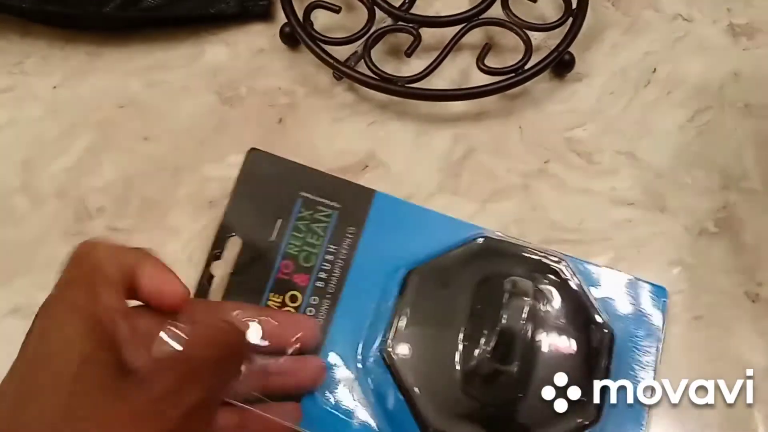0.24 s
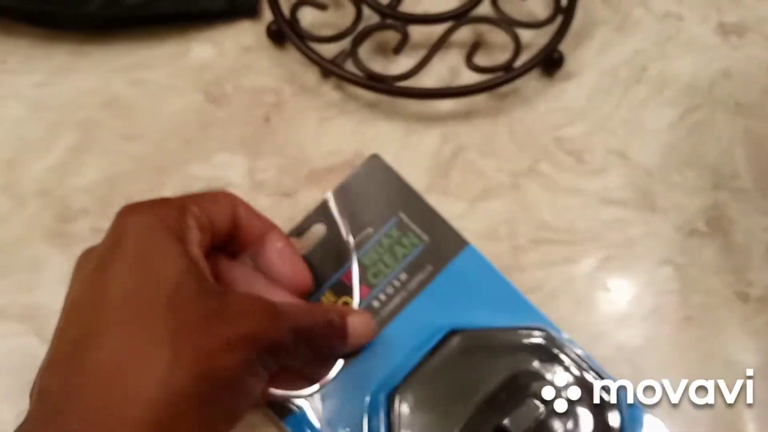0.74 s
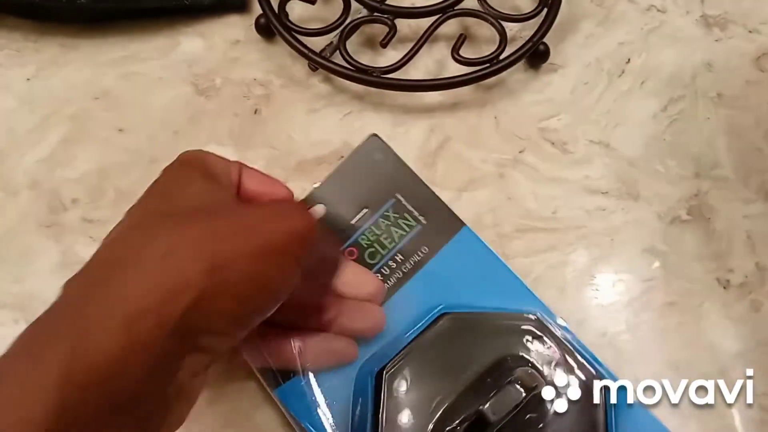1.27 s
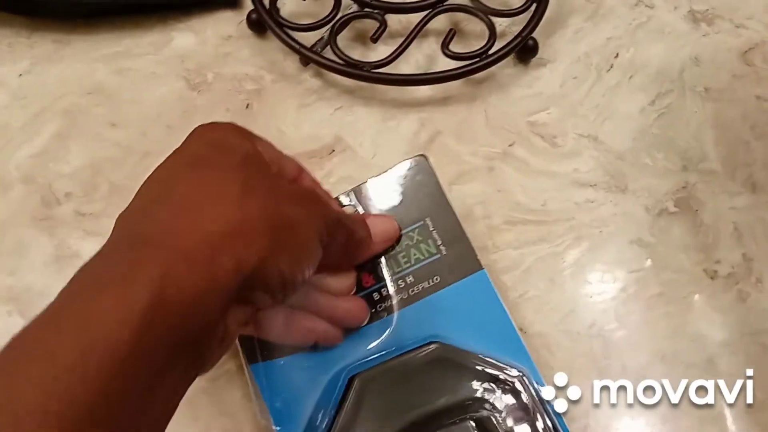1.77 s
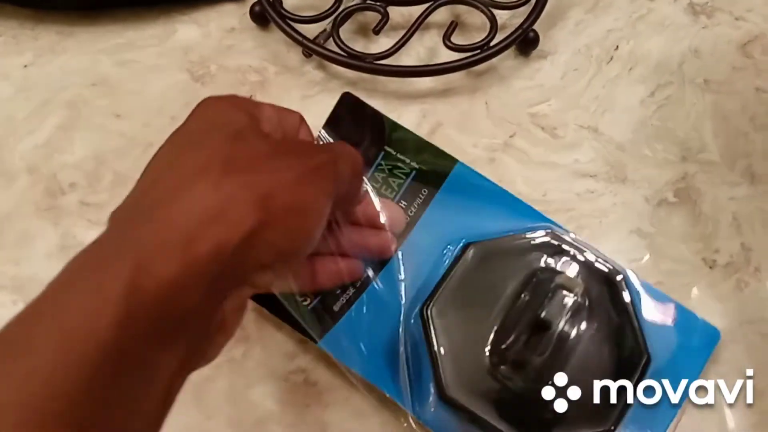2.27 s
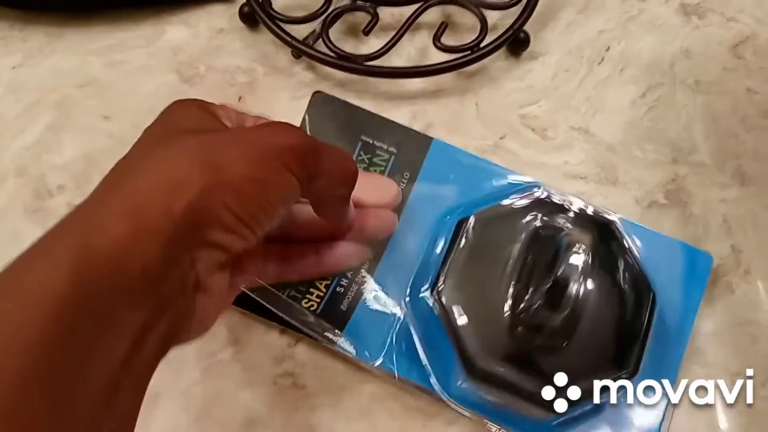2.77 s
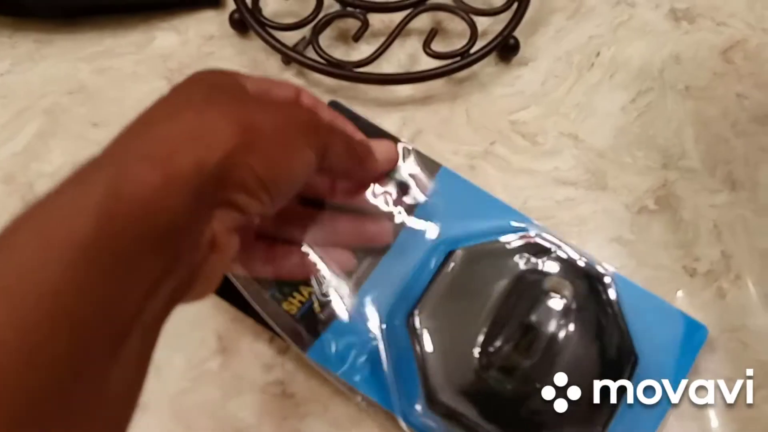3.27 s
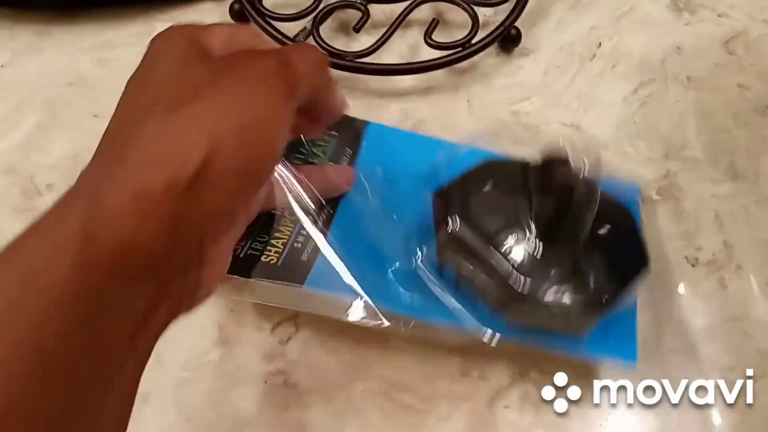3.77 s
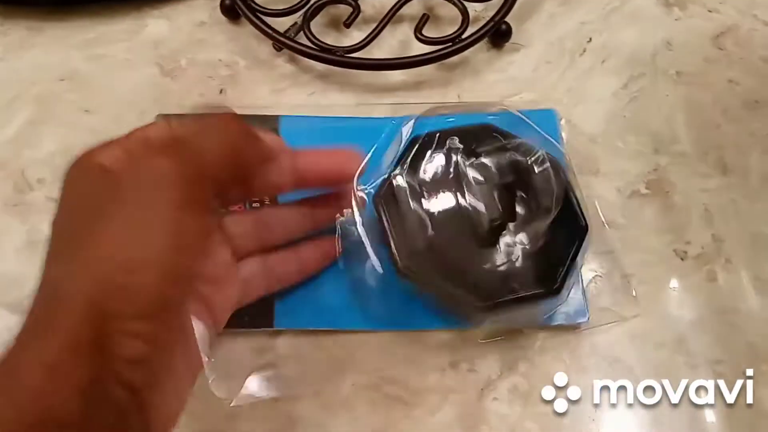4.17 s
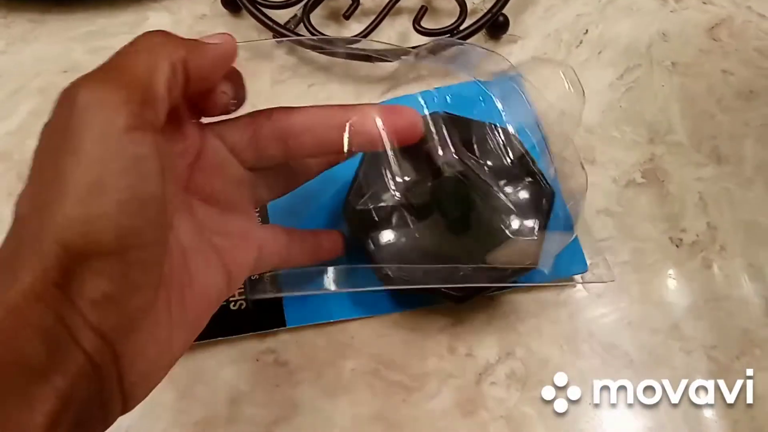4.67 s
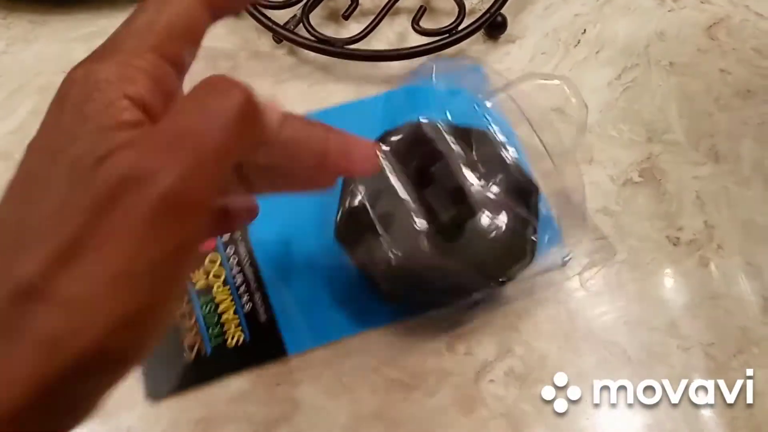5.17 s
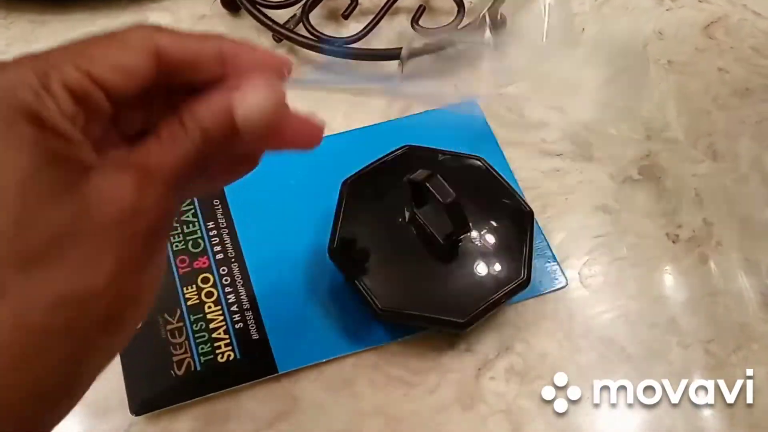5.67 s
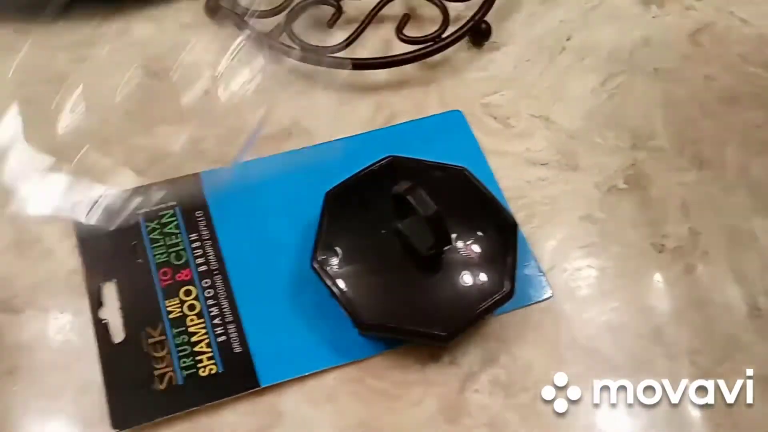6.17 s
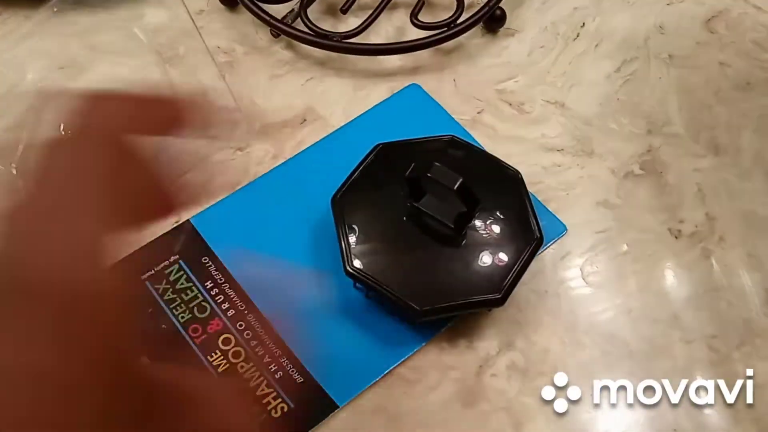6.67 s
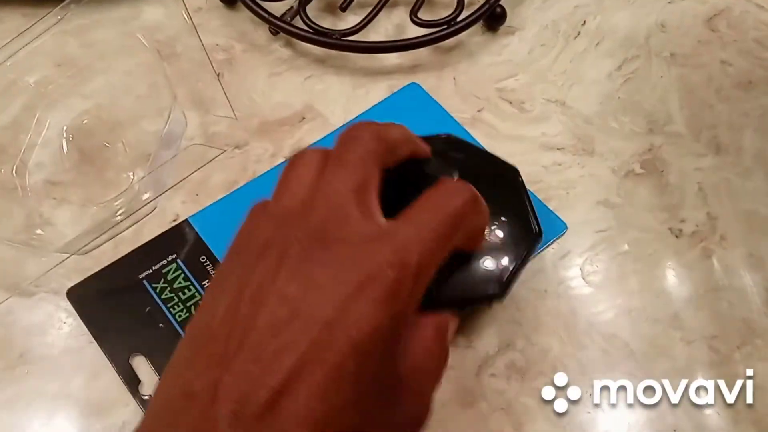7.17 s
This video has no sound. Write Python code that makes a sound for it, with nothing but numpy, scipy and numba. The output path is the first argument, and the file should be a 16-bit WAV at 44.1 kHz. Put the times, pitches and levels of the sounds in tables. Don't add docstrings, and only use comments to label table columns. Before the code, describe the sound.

Stiff clear plastic packaging crackles, snaps and creaks as it is pried off its card on a stone counter in a small echoing room.

```python
import sys
import numpy as np
from scipy import signal
from scipy.fft import rfft, irfft
from scipy.io import wavfile
from scipy.ndimage import uniform_filter1d, minimum_filter1d
from numba import njit

SR = 44100
rng = np.random.default_rng(int(sys.argv[2]) if len(sys.argv) > 2 else 0)


def linear_from_db(decibels):
    return 10 ** (np.asarray(decibels, float) / 20)


def wav_record(signal):
    frames = np.transpose(np.atleast_2d(signal))
    bounded = np.clip(frames, -1, 1)
    quanta = np.round(bounded * 32767).astype(np.int16)
    wavfile.write(sys.argv[1], SR, quanta)


N = 327222
LIFT_S, GRIP_S = 3.95, 6.3


def unit(x):
    return x / np.sqrt(np.mean(x ** 2))


def shape(points, size):
    hz, value = np.transpose(points)
    return np.interp(np.log(np.fft.rfftfreq(size, 1 / SR) + 1), np.log(hz), value)


def causal(points, size=2048):
    cepstrum = irfft(np.log(linear_from_db(shape(points, size))))
    cepstrum[1:size // 2] *= 2
    cepstrum[size // 2 + 1:] = 0
    return irfft(np.exp(rfft(cepstrum)))


def band(x, lo_hz, hi_hz):
    sos = signal.butter(3, [lo_hz, hi_hz], "bandpass", fs=SR, output="sos")
    return signal.sosfilt(sos, x) * np.sqrt(SR / 2 / (hi_hz - lo_hz))


def ring(x, hz, t60):
    pole = np.exp(2j * np.pi * hz / SR - np.log(1000) / (t60 * SR))
    return signal.lfilter([1], [1, -pole], x).imag


def hush():
    # hz [Hz], density_db [dB per Hz]
    spectrum = [(18, -33.5), (30, -10.5), (48, 1), (112, 3), (1910, -19.5), (2680, -11), (4190, -14),
                (9220, -7.5), (16000, -12.5)]
    noise = irfft(rfft(rng.standard_normal(N)) * linear_from_db(shape(spectrum, N)), N)
    return linear_from_db(-68.5) * unit(noise)


def cracks(count, per_s, spread_db):
    hit = rng.random(count) < per_s / SR
    return hit * rng.standard_normal(count) * linear_from_db(spread_db * rng.exponential(size=count))


def split(x):
    return x * rng.choice([-1., 1.], (3, len(x)))


def rustle():
    # start_s [s], flex_db [dB] of the sheet, press_db [dB] on the counter
    pack_hold = [(0, -33.5, -31), (.28, -37.5, -44), (.82, -52, -55.5), (1.16, -36.5, -31.5),
                 (1.33, -45.5, -53.5), (2.04, -47, -39.5), (2.24, -52, -26.5), (2.45, -59, -51),
                 (2.73, -47, -80), (2.75, -37.5, -34), (3.35, -50.5, -64), (3.55, -45, -44),
                 (3.7, -42, -36), (3.74, -28, -23.5), (4.04, -50.5, -61), (4.42, -36, -33),
                 (4.54, -53.5, -57.5), (5.24, -49.5, -74), (5.578, -45.5, -47), (5.95, -92, -75.5)]
    # start_s [s], flex_db [dB], press_db [dB]
    brush_hold = [
        (6.349, -67, -50),
        (6.572, -59, -60),
        (6.834, -42.5, -37.5),
        (7.05, -66, -76),
    ]
    rumble_db, rumble_slope = -62.5, 0.67
    sizzle_db = -3
    drive, rumble, t = np.zeros((3, N)), np.zeros(N), np.arange(N) / SR
    grains = unit(cracks(N, 1200., 0.9)) + 0.37 * rng.standard_normal(N)
    parts = split(unit(grains))
    rub = band(rng.standard_normal(N), 86.0, 160.0)
    for table in pack_hold, brush_hold:
        s, flex_db, press_db = np.transpose(table)
        rub_db = rumble_db + rumble_slope * (press_db + 45)
        rumble += rub * linear_from_db(np.interp(t, s, rub_db, left=-120, right=-120))
        for row, part, db in zip(drive, parts, (press_db, flex_db, flex_db + sizzle_db)):
            row += part * linear_from_db(np.interp(t, s, db - 6, left=-120, right=-120))
    wrinkles = signal.butter(N=3, Wn=2120, btype="highpass", fs=SR, output="sos")
    drive[1] = signal.sosfilt(wrinkles, drive[1])
    return drive, rumble


def snaps():
    # start_s [s], level_db [dB], body_db [dB], sizzle_db [dB], burst_ms [ms]
    prying = [(0.0517, -26, -6, -9, 18), (0.136, -32.5, 1.5, -7, 8.2), (0.1651, -22, -1.5, -11.5, 11.7),
              (0.2589, -26, 10, -23, 4.1), (0.266, -28, -4, 12.5, 4.7), (0.3426, -12, 2, -12.5, 3.3),
              (0.3535, -16, -6, -2, 6.7), (0.4531, -28, 1.5, 13.5, 5.9), (0.635, -13, 5, -4, 7.2),
              (0.6637, -27.5, 2.5, -5, 7.2), (0.833, -34, -11, -2.5, 8.4), (1.0032, -28, 0, -5, 4.3),
              (1.074, -32.5, 6, -5, 9.4), (1.1712, -28.5, -17.5, 8, 10.2), (1.2148, -27.5, 8.5, -17, 4.4),
              (1.2851, -26.5, -30, 2, 3.4), (1.335, -2.5, -5.5, -3, 3.96), (1.451, -19, -11, -1.5, 3.4),
              (1.555, -31, -27.5, 2, 20), (1.5803, -30.5, -4.5, 3.5, 7.8), (1.601, -34.5, 2, -4, 31),
              (1.699, -3.5, -3, -4, 1.82), (1.7752, -23.5, -0.5, -12, 4.8), (1.972, -25.5, -11.5, -1, 1.6)]
    # start_s [s], level_db [dB], body_db [dB], sizzle_db [dB], burst_ms [ms]
    ripping = [(2.1289, -2, -6.5, -2, 1.65), (2.1189, -26.5, -7.5, -2, 19), (2.457, -31, 1.5, -9, 4.9),
               (2.2265, 1, -11, -6, 1.92), (2.232, -12, -3, 9.5, 1.56), (2.263, -26.5, 2, -6, 3.2),
               (2.2774, -1.5, -6, -15.5, 2.08), (2.328, -19.5, -34, -3, 2.1),
               (2.3602, -15.5, -0.5, -26.5, 1.7), (2.381, -19, -10.5, -19.5, 3),
               (2.403, -20.5, 0.5, -23.5, 1.8), (2.467, -15.5, -1.5, -11.5, 1), (2.4793, -24, 5, -26, 1.8),
               (2.5037, 8, -1.5, -2, 6.6), (2.508, -9, -13, 7, 8), (2.7478, -22, 7, 2.5, 5.6),
               (2.8101, -10.5, -6.5, 1, 4.8), (2.8917, -22, -19, 5, 5.7), (2.9004, -15, -7, 0.5, 3.4),
               (2.9349, -15.5, -4.5, -6, 4.3), (3.0602, -15.5, -4.5, 1, 4.2),
               (3.4834, -18.5, 0, -13.5, 1.3), (3.5025, -15.5, 2.5, -29, 4.1),
               (3.7143, -6, -10, -10.5, 4.3)]
    # start_s [s], level_db [dB], body_db [dB], sizzle_db [dB], burst_ms [ms]
    lifting = [(3.8582, -24, -19.5, 7, 5.4), (3.9639, -29, 4.5, -4, 8), (4.0144, -36, 1, 0.5, 11),
               (4.122, -32, -1, -3, 10.3), (4.221, -39, -2, 0, 21), (4.2524, -14, 2, -5, 5.4),
               (4.3155, -32, 5.5, 4, 19), (4.3333, -26, -1.5, -1, 20), (4.4075, -16, -21.5, -3, 4.6),
               (4.4145, -25, -7, -5, 22), (4.56, -38.5, -1.5, -11, 22), (4.684, -31.5, -10.5, -6.5, 14),
               (4.738, -26.5, 3, -8, 24), (4.7456, -21, 1.5, 7.5, 11.5), (4.868, -34, -3, 3.5, 3.7),
               (5.0308, -35, -8, 13.5, 4.8), (5.1465, -37, -39, -1, 6.2), (5.279, -28.5, -12, 9.5, 1.9),
               (5.311, -28, -10, 3.5, 6.6), (5.4141, -24, -14, -5.5, 11.7), (5.463, -9, -1, 2.5, 7.4),
               (5.499, -25.5, -19, 4, 21), (5.702, -34, -4, -1, 10), (5.7417, -20, -6.5, 7.5, 7.5)]
    # start_s [s], level_db [dB], body_db [dB], sizzle_db [dB], burst_ms [ms]
    gripping = [(5.818, -39, 10, -16.5, 7.4), (5.8407, -36, 13.5, -5, 1.7), (6.087, -48.5, -44, 24, 2.2),
                (6.3515, -37, 7, -6, 7.7), (6.369, -44, 15.5, 0, 21), (6.397, -34.5, 8, 1.5, 3.2),
                (6.409, -44.5, 15.5, 4, 15), (6.4212, -43, 11.5, -7, 6.3), (6.5145, -27.5, -33, 1.5, 3.8),
                (6.5646, -39, -13, 3.5, 12.5), (6.5888, -27, -7.5, 3.5, 8.4), (6.6288, -36, -23, 8.5, 3),
                (6.661, -31, -9, 4, 3.4), (6.671, -38, 4, -3, 3), (6.6817, -35, -1, 2, 3),
                (6.7036, -35.5, 0, 3, 2.9), (6.715, -35.5, -7, 8, 2.8), (6.7277, -36.5, -2, 4, 3),
                (6.78, -35, -39, 3.5, 10.6), (6.8393, -27, -33, 0.5, 6), (6.896, -37.5, -9.5, -4.5, 19.5),
                (7.0887, -59, -32, 0, 16), (7.1814, -56.5, -32, 5, 5.2), (7.3435, -73, -9.5, 15.5, 13)]
    # start_s [s], level_db [dB], body_db [dB], sizzle_db [dB], fall_ms [ms]
    tear_rows = [(.005, -23, 0, -7, 18), (.539, -35, 8.5, 3.5, 10.7), (0.599, -29, 2, 2, 23),
                 (0.842, -30.5, -30, 8, 25), (1.292, -32.5, -6, 9.5, 28), (2.232, -26.5, -8, 8, 65),
                 (.262, -30.5, -10.5, 5.5, 3.5), (2.511, 7, -5, -5.5, 7.9), (2.846, -26.5, 3, 3, 33),
                 (3.383, -39.5, -1.5, -7, 32), (3.727, -13.5, -2.5, .5, 49.5), (4.079, -31.5, -2, 3, 14),
                 (4.19, -41.5, -22, 3, 24), (4.909, -29, -6.5, 1, 43.6), (5.373, -31, -5, 3, 35),
                 (3.162, -36.5, -3, 2, 39), (6.035, -61, -9.5, 18.5, 88), (6.429, -40.5, 9, -1.5, 34),
                 (6.598, -39.5, 11.5, -28, 29.6)]
    linger = np.array([[1.2], [1.], [.6]])
    longest_ms, tear_rise = 14, 0.49
    size = 16384
    drive, ms = np.zeros((3, N + size)), np.arange(size) * 1000 / SR
    swarm = split(unit(cracks(N + size, 16000., 0.4)))
    events = []
    for *start_and_levels, burst_ms in prying + ripping + lifting + gripping + slips():
        events.append((*start_and_levels, .3, min(1.046 * burst_ms - 1.2, longest_ms)))
    for *start_and_levels, fall_ms in tear_rows:
        events.append((*start_and_levels, tear_rise * fall_ms, fall_ms))
    for s, db, body_db, sizzle_db, rise_ms, fall_ms in events:
        i = int(s * SR)
        rise = 1 - np.exp(-ms / max(rise_ms, .05))
        fall = np.exp(-ms / max(fall_ms, .3) / linger)
        burst = swarm[:, i:i + size] * fall * rise
        burst[:, 6] += 0.3 / max(rise_ms, .05)
        parts_db = np.array([[body_db], [0], [sizzle_db]])
        drive[:, i:i + size] += linear_from_db(db - 0.5 + parts_db) * burst
    return drive[:, :N]


def knocks():
    # start_s [s], level_db [dB], pitch_hz [Hz], t60_s [s],
    # contact_ms [ms]
    blows = [(0.342, -18.5, 421, 0.04, 6.5), (0.637, -58, 300, 0.022, 5.1), (2.503, 9, 108, 0.03, 5),
             (2.748, -12.5, 380, 0.066, 6.3), (3.06, -25, 156, 0.028, 15), (4.25, -40, 316, 0.042, 5.2),
             (4.633, -34, 803, 0.18, 3.7), (5.461, -9, 875, 0.08, 10), (5.748, -21, 871, .1, 10),
             (5.816, -23, 940, .05, 6), (5.816, -28, 620, 0.082, 8.1), (.006, -5, 1330, .015, 45),
             (.006, -18, 685, 0.043, 40), (.165, -9, 1350, .015, 5), (.259, -12, 1150, .015, 3),
             (1.53, -28, 1250, .02, 4), (4.745, -20, 875, .1, 14), (4.253, -13, 1120, .03, 7),
             (1.335, -17.5, 715, 0.055, 8), (2.506, -14, 300, .05, 12), (2.507, -3, 1100, .03, 20),
             (5.473, -24, 285, .06, 25), (5.817, -24, 425, 0.15, 22), (5.828, -15, 296, 0.08, 21),
             (2.508, 12, 58, 0.04, 8), (0.551, -29, 191.3, .05, 48), (6.413, -34.5, 169, 0.17, 39),
             (6.861, -28, 266, 0.1, 26)]
    overtone = .35
    out, ms = np.zeros(N), np.arange(N) * 1000 / SR
    jolts = band(rng.standard_normal(N), 36.0, 1300.0)
    for s, db, hz, t60, contact_ms in blows:
        since = ms - 1000 * s
        push = (since > 0) * np.exp(-np.abs(since) / contact_ms) * (1 + jolts)
        push *= linear_from_db(db) / np.linalg.norm(push) / 4
        pair = ring(push, hz, t60) + overtone * ring(push, 1.3 * hz, t60)
        out += signal.lfilter(*signal.butter(2, hz / 2, "highpass", fs=SR), pair)
    return out


def slips():
    # start_s [s], length_s [s], slips_per_s [1/s], level_db [dB], swell_db [dB] to the end
    creaks = [(0.77, 0.04, 150, -31.5, -2), (0.175, .05, 143, -25, -6), (1.075, 0.044, 110, -28, -3),
              (1.15, 0.025, 150, -28.5, 2), (1.555, .04, 130, -30.5, -5), (2.135, 0.02, 150, -24, 0),
              (3.39, 0.035, 130, -42.5, -1), (3.515, 0.061, 80, -26, -3), (5.148, 0.042, 83, -32.5, -5.5),
              (2.24, 0.065, 120, -22, -1.5), (.01, .065, 120, -24, -4)]
    body_db, sizzle_db, burst_ms = -7.5, -11.5, 1.79
    uneven, scatter_db = .07, 2
    rows = []
    for s, length, per_s, db, swell_db in creaks:
        gap, size, body, sizzle = rng.standard_normal((24, 4)).T
        since = np.cumsum(np.exp(uneven * gap)) / per_s - 1 / per_s
        level = db + swell_db * since / length + scatter_db * size
        bodies = body_db + scatter_db * body
        sizzles = sizzle_db + scatter_db * sizzle
        for a, b, c, d in zip(since, level, bodies, sizzles):
            if 0 <= a < length:
                rows.append((s + a, b, c, d, burst_ms))
    return rows


def ticks():
    # start_s [s], peak_db [dB], pitch_hz [Hz], wide_db [dB] wide-band share
    early_ticks = [(0.0884, -10, 3240, -3), (0.1854, -18, 2960, -3), (0.1934, -18, 2520, -3),
                   (0.2154, -23, 2850, -3), (0.7575, -27, 2530, -3), (0.7891, -36, 2550, -3),
                   (0.9423, -36, 2550, -3), (1.0271, -26, 2800, -3), (1.0405, -22, 2880, -3),
                   (1.1194, -24.5, 2730, -3), (1.1274, -27, 2770, -3), (1.1404, -25, 2600, -3),
                   (1.1483, -21, 2650, -3), (1.2481, -26, 2690, -3), (1.2974, -23, 2580, -3),
                   (1.5304, -25, 2470, -3), (1.6257, -24, 2650, -3), (1.8736, -28, 2540, -3),
                   (1.918, -19, 2750, -3), (1.931, -27, 2750, -3), (1.9589, -20, 3050, -3),
                   (1.9949, -28, 2750, -3), (2.001, -26, 3180, -3), (2.0273, -23, 3000, -3),
                   (2.048, -17.5, 2594, -3), (2.069, -19.5, 2580, -3), (2.0832, -20, 2580, -3),
                   (2.0974, -21, 2530, -3), (2.4503, -18, 3010, -3), (3.182, -21, 2980, -3),
                   (3.2455, -32, 3170, -3), (3.2695, -32, 2690, -3), (3.3954, -32, 2680, -3),
                   (3.4414, -35, 2710, -3), (3.4491, -30, 2700, -3), (3.4564, -27, 2640, -3)]
    # start_s [s], peak_db [dB], pitch_hz [Hz], wide_db [dB]
    late_ticks = [(3.5803, -20, 2810, -4), (3.5972, -17, 3030, -4), (3.6122, -15, 3020, -4),
                  (3.6247, -15, 3010, -4), (3.6381, -13, 3010, -4), (3.6666, -11, 2940, -4),
                  (3.6825, -11, 3010, -4), (4.0861, -26, 837, -4), (4.2123, -25, 2830, -4),
                  (4.9177, -26, 2790, -4), (5.1248, -25.5, 3220, -4), (5.2121, -34, 3220, -4),
                  (5.3864, -23, 856, -4), (6.4562, -18, 1590, -4), (6.4954, -22, 888, -4),
                  (6.6034, -17, 1590, -4), (6.8169, -22, 1670, -4), (6.8554, -28, 869, -4),
                  (6.9314, -33, 3110, -4), (7.3144, -57, 2750, -4)]
    # start_s [s], peak_db [dB], pitch_hz [Hz], wide_db [dB]
    further_ticks = [(.0957, -14, 3220, 0), (.1017, -12, 2600, 0), (.1087, -11, 2380, 0),
                     (2.160, -17, 3000, 0), (2.168, -11, 3300, -1), (2.178, -6, 2900, -3),
                     (2.1884, -11, 2550, -3), (2.1984, -15, 3370, -3), (2.208, -8, 2610, -3),
                     (3.6514, -15, 2000, -2), (1.889, -32, 2700, 8), (1.906, -34, 2700, 8),
                     (2.106, -24, 2800, -3), (3.048, -29, 2400, -3), (3.054, -24, 3020, -3),
                     (3.465, -27, 2700, -4), (3.473, -27, 2700, -4), (3.698, -15, 2900, -4),
                     (3.704, -17, 2900, -4), (3.739, -6, 2550, -4), (4.391, -22, 2690, -4),
                     (5.266, -28, 3500, -2), (3.549, -22, 3000, -2), (3.566, -24, 3000, -3)]
    rise_ms, fall_ms, facet_t60_s = .3, .8, .004
    out, ms = np.zeros(N + 1024), np.arange(1024) * 1000 / SR
    puff = (1 - np.exp(-ms / rise_ms)) * np.exp(-ms / fall_ms)
    for s, db, hz, wide_db in list(early_ticks) + list(late_ticks) + list(further_ticks):
        grit = puff * rng.standard_normal(1024)
        facet = ring(grit, hz, facet_t60_s)
        tick = facet / np.abs(facet).max() + linear_from_db(wide_db) * grit / np.abs(grit).max()
        out[int(s * SR):][:1024] += linear_from_db(db - 6) * tick
    return out[:N]


def sheet_voices(drive, t):
    # low_hz [Hz], high_hz [Hz]
    bands = [(280, 1500), (1500, 5500), (5500, 17000)]
    # low_hz [Hz], high_hz [Hz], level_db [dB]
    card = [(570, 867, -14.5), (1174, 1200, -29)]
    push, crack, sizzle = drive
    glued, lifted, gripped = t < LIFT_S, t >= LIFT_S, t >= GRIP_S
    out = band(push * (glued + linear_from_db(-1.5) * gripped), *bands[0])
    out += band(crack, *bands[1]) + band(sizzle, *bands[2])
    out += sum(linear_from_db(db) * band(push * glued, lo, hi) for lo, hi, db in card)
    out += band(push * (lifted & ~gripped), 612, 1454)
    out += linear_from_db(-11) * band(push * lifted, 261, 458)
    out += band(push * gripped, 702, 2080)
    out += linear_from_db(-7) * band(sizzle * gripped, 10250, 14970)
    return out


def held_modes(sheet, t):
    # pitch_hz [Hz], level_db [dB], t60_s [s]
    glued = [(750.5, -25, .05), (1080, -21, .03), (1300, -20, .03), (2600, -22.5, .02)]
    # pitch_hz [Hz], level_db [dB], t60_s [s]
    brush = [(805, -17, .05), (1090, -20, .04), (1577, -12, 0.046)]
    out = np.zeros(N)
    for modes, when in (glued, t < LIFT_S), (brush, t >= GRIP_S):
        out += sum(linear_from_db(db - 25) * ring(sheet * when, hz, t60) for hz, db, t60 in modes)
    return out


def shell_ring(sheet, t):
    # pitch_hz [Hz], level_db [dB], t60_s [s]
    modes = [(624.7, -23, 0.033), (802, -21.5, 0.097), (868, -16.5, 0.2), (1056, -18.5, 0.059),
             (2400, -18.5, 0.054)]
    # start_s [s], ring_db [dB]
    freedom = [
        (0, -29),
        (3.9, -26),
        (4.3, -7),
        (4.8, -1),
        (5.25, -3),
        (5.5, 3),
        (5.9, -4),
        (6.3, -6),
        (7.4, -20),
    ]
    s, db = np.transpose(freedom)
    loose = sheet * linear_from_db(np.interp(t, s, db) - 27.5)
    return sum(linear_from_db(db) * ring(loose, hz, t60) for hz, db, t60 in modes)


def room():
    # hz [Hz], t60_s [s]
    decay = [(150, 0.31), (1000, 0.34), (3500, 0.32), (9000, 0.3), (16000, 0.079)]
    t = np.arange(SR // 2) / SR
    f, frames, z = signal.stft(rng.standard_normal(len(t)), SR, nperseg=256)
    fall = linear_from_db(-60 * frames / shape(decay, size=256)[:, None])
    tail = signal.istft(z * fall, SR)[1][:len(t)]
    tail *= np.clip(t / 0.012, 0, 1)
    near = cracks(len(t), 2700.0, 0.68) * np.exp(-t / 0.009)
    echo = linear_from_db(-12) * tail / np.linalg.norm(tail) + linear_from_db(-8.5) * near / np.linalg.norm(near)
    return signal.sosfilt(signal.butter(N=5, Wn=270., btype="highpass", fs=SR, output="sos"), echo)


def slide():
    start_s, rise_s, swish_fall_s, edge_fall_s = 6.035, 0.052, 0.065, 0.13
    since = np.maximum(np.arange(N) / SR - start_s, 0)
    rub = rng.standard_normal(N) * (1 - np.exp(-since / rise_s)) * np.clip((.28 - since) / .05, 0, 1)
    swish = band(rub * np.exp(-since / swish_fall_s), 2300, 4080)
    edge = band(rub * np.exp(-since / edge_fall_s), 3200, 3650)
    return linear_from_db(-55) * (swish + linear_from_db(-9) * edge)


def scene():
    # hz [Hz], gain_db [dB]
    colour = [(30, -30), (100, -7), (170, -3), (400, -4.5), (850, 1.5), (1700, -1), (2800, 9.5),
              (4200, 0.5), (6000, -4.5), (8500, 5), (12000, 3), (16000, -7.5)]
    t = np.arange(N) / SR
    flexing, rumble = rustle()
    drive = snaps() + flexing
    sheet = sheet_voices(drive, t)
    pack = sheet + held_modes(sheet, t) + shell_ring(sheet, t) + knocks() + ticks() + slide()
    pack += linear_from_db(-26) * band(drive[0], 90, 239)
    echoed = pack + signal.fftconvolve(pack, room())[:N]
    heard = signal.fftconvolve(echoed, causal(colour))[:N]
    return np.tile(heard + rumble + hush(), (2, 1))


@njit
def recover(gain, step):
    out, g = np.empty(len(gain)), 1.
    for i in range(len(gain)):
        g = min(gain[i], g * step)
        out[i] = g
    return out


def roll_off(x):
    return signal.sosfilt(signal.butter(12, 16460, fs=SR, output="sos"), x)


def record(dry):
    ceiling_db, recovery_db_s = 2.5, 223
    ahead = int(0.015 * SR)
    need = np.minimum(1, linear_from_db(ceiling_db) / (np.abs(dry[0]) + 1e-9))
    early = minimum_filter1d(need, ahead, origin=-(ahead // 2))
    gain = uniform_filter1d(recover(early, linear_from_db(recovery_db_s / SR)), size=128)
    top = signal.ellip(8, .2, 60, 15900, fs=SR, output="sos")
    limited = signal.sosfilt(top, np.clip(dry * gain, -1, 1))
    mix = np.clip(limited, -1, 1)
    return roll_off(mix)


dry = scene()
out = record(dry)
wav_record(out)
```